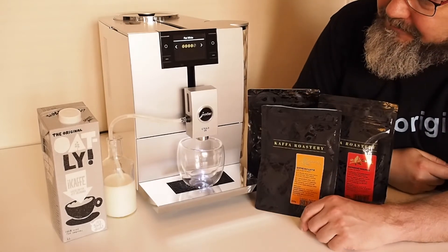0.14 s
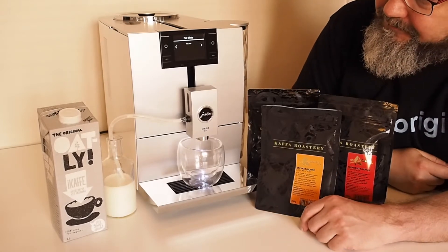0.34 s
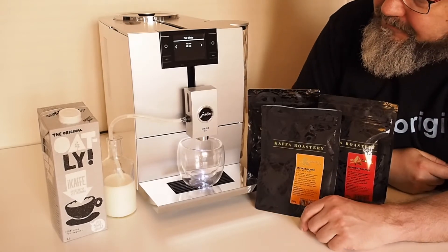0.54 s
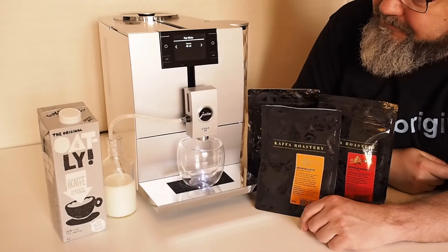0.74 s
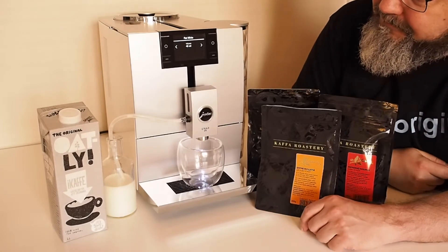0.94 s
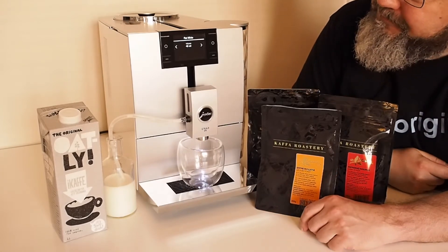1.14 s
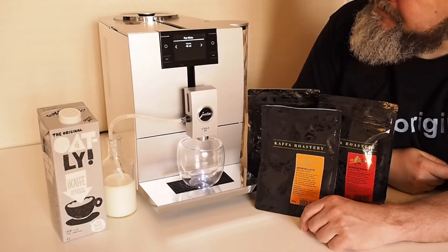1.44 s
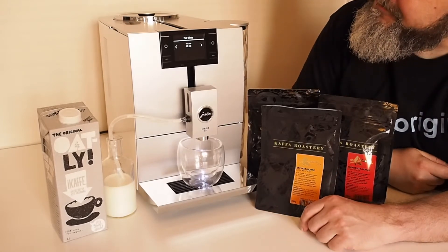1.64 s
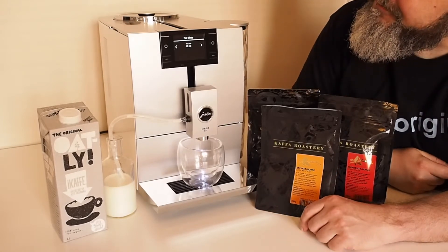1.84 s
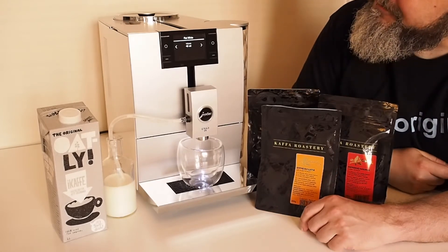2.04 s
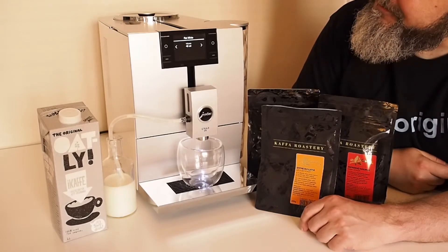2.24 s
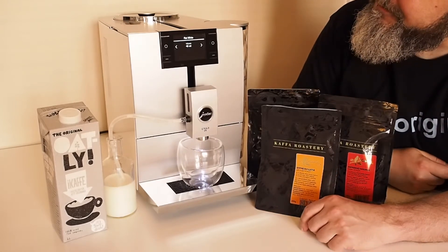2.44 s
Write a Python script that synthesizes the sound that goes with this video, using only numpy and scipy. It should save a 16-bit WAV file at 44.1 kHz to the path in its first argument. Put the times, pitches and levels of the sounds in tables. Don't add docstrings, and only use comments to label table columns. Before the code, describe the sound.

Bean-to-cup coffee machine heard close up in a small kitchen: the tail of coarse grinding, a quiet gap with faint hum, then a rumbling brew motor with plastic knocks, scrapes, a sharp latch snap and falling whine.

```python
import sys
import numpy as np
from scipy import signal
from scipy.fft import rfft, irfft
from scipy.io import wavfile
from scipy.ndimage import uniform_filter1d

SR = 44100
rng = np.random.default_rng(int(sys.argv[2]) if len(sys.argv) > 2 else 0)


def int16_out(signal):
    q = np.round(np.clip(np.atleast_2d(signal).T, -1, 1) * 32767)
    wavfile.write(sys.argv[1], SR, q.astype(np.int16))


def boost_factor(decibels):
    exponent = np.asarray(decibels, float) / 20
    return 10 ** exponent


N = 114660


def level(x, db):
    return x * boost_factor(db) / np.sqrt(np.mean(x ** 2))


def conv(x, h):
    return signal.fftconvolve(x, h)[:N]


def band(x, hz, width_hz):
    return signal.lfilter(*signal.iirpeak(hz, hz / width_hz, SR), x)


def colour(x, points):
    freq_hz = np.arange(2049) * SR / 4096 + 1
    hz, db = np.array(points, float).T
    log_gain = np.interp(np.log(freq_hz), np.log(hz), db) * np.log(10) / 20
    cepstrum = irfft(log_gain)
    cepstrum[1:2048] *= 2
    cepstrum[2049:] = 0
    return conv(x, irfft(np.exp(rfft(cepstrum))))


def grit(per_s, spread_db):
    chance, sign, luck = rng.random((3, N))
    size = np.minimum(-np.log(1 - luck), 3)
    ticks = (chance < per_s / SR) * np.sign(sign - 0.5) * boost_factor(spread_db * size)
    return level(ticks, 0)


def walk(rate):
    hold = int(SR / rate)
    steps = np.repeat(rng.standard_normal(N // hold + 1), hold)
    smooth = uniform_filter1d(uniform_filter1d(steps, hold), hold)[:N]
    return smooth / smooth.std()


def bursts(rows):
    t = np.arange(N) / SR
    total = 0
    for start_s, level_db, length_s, *_ in rows:
        late = np.maximum(t - start_s, 0)
        total = total + boost_factor(level_db) * (t >= start_s) * np.exp(-(late / length_s) ** 2)
    return total


def swell(t, row):
    return boost_factor(row[1]) * np.exp(-((t - row[0]) / row[2]) ** 2)


# pitch_hz, level_db (per Hz)
GRIND_TONE = [(35, -69), (60, -22.5), (254, -4.5), (706, -8), (1000, -7), (1750, -5), (5600, -14),
              (8700, -15.5), (15600, -24.5)]
# time_s, level_db
GRIND_LOAD = [
    (0.0, -14),
    (.025, -17.5),
    (0.06, -19.5),
    (.1, -18.5),
    (0.144, -18),
    (.19, -19),
    (0.23, -19.5),
]
GRIND_STOP_S, COAST_T60_S = 0.24, 0.41


def burrs(t):
    coast_db = -60 * np.maximum(t - GRIND_STOP_S, 0) / COAST_T60_S
    load_db = np.interp(t, *np.array(GRIND_LOAD).T) + coast_db
    cracks = grit(3000, 0.8)
    return level(housing(colour(cracks, GRIND_TONE)), -1.23) * boost_factor(load_db + 1.0 * walk(41.8))


# start_s,
# level_db, length_s, pitch_hz
BEANS = [(0.027, -27.5, 0.079, 9240), (0.069, -29, 0.033, 4280), (0.087, -29.5, 0.013, 9400),
         (0.116, -28.5, 0.065, 4100), (0.12, -26.5, 0.04, 9400), (0.141, -23, 0.033, 712),
         (0.137, -18.5, 0.027, 476.4), (0.198, -30.5, 0.081, 1047), (0.209, -24, 0.025, 3840),
         (.212, -21.5, 0.011, 8850), (0.218, -26, 0.03, 712), (.3935, -50.5, 0.005, 10600),
         (.4575, -70, .004, 9600), (0.58, -53.5, 0.0037, 9400), (.579, -54.5, .004, 4500)]
BEAN_Q_AT_1K, BEAN_Q_SLOPE = 29, -0.75


def cracking_beans():
    chips = grit(6000, 1.7)
    out = 0
    for row in BEANS:
        hz = row[3]
        width_hz = hz / (BEAN_Q_AT_1K * (hz / 1000) ** BEAN_Q_SLOPE)
        out = out + band(chips * bursts([row]), hz, width_hz) * np.sqrt(SR / np.pi / width_hz)
    return out


# time_s, shaft_hz, rumble_db, whine_db
MOTOR = [(1.38, 83.8, -40.5, -57), (1.45, 95.65, -40.5, -46), (1.5, 100.3, -35.5, -49),
         (1.561, 106.1, -36, -42), (1.68, 109, -35, -44), (1.76, 113.3, -36, -53), (1.849, 114.3, -37, -44),
         (1.899, 110.1, -38, -46), (1.948, 106.8, -37, -42), (2.019, 101.1, -36, -50),
         (2.121, 101.5, -35, -42), (2.239, 101.1, -37.5, -41), (2.291, 98.25, -35, -49),
         (2.34, 95.7, -38, -40.5), (2.39, 90.07, -36.5, -45), (2.452, 85.76, -34.5, -40),
         (2.53, 81.4, -38.5, -43), (2.6, 79.3, -37.5, -52)]
MOTOR_ON_S, MOTOR_RISE_S = 1.357, 0.0016


def brew_motor(t):
    when, shaft_hz, rumble_db, whine_db = np.array(MOTOR).T
    shaft_hz, rumble_db, whine_db = (np.interp(t, when, column) for column in (shaft_hz, rumble_db, whine_db))
    turn = 2 * np.pi * np.cumsum(shaft_hz * (1 + 0.0059 * walk(30.07))) / SR
    teeth = grit(4000, 1) * (1 + 0.14 * np.cos(turn))
    noise = gear_rumble(teeth) + brush_hiss(t, turn, teeth, shaft_hz)
    tones = gear_whine(t, turn, whine_db) + shell_booms(t)
    on = np.clip((t - MOTOR_ON_S) / MOTOR_RISE_S, 0, 1)
    return on * noise * boost_factor(rumble_db), on * tones


# pitch_hz, level_db (per Hz)
RUMBLE_TONE = [(29, -70), (50, -21.5), (227, -3.5), (300, -6), (720, -9.5), (880, -13.5), (2500, -23),
               (10300, -35.5), (15600, -69)]
# pitch_hz, width_hz, level_db
TRAY = [(133, 23, -12.5), (183.4, 19, -12), (279, 21, -16)]


def gear_rumble(teeth):
    rumble = level(housing(colour(teeth, RUMBLE_TONE)), 0) * boost_factor(1.0 * walk(24.94))
    for hz, width_hz, db in TRAY:
        ring = band(band(teeth, hz, width_hz), hz, 2 * width_hz)
        rumble = rumble + level(ring, db + 1.7 * walk(6.73))
    return rumble


# pitch_hz, width_hz, level_db
SING = [(10600, 150, -30), (5530, 300, -26.5)]
# pitch_hz, width_hz, level_db
BEARING = (5600, 3000, -31)
# start_s, end_s, pitch_hz, width_hz, level_db
SQUEAL = (1.93, 2.22, 7950, 70, -30)
BRUSH_DB_PER_HZ, FULL_HZ = 0.16, 110


def brush_hiss(t, turn, teeth, shaft_hz):
    rubbing = rng.standard_normal(N) * (1 + 0.1 * np.cos(turn))
    hiss = level(band(rubbing, 10300, 3500), -17.5)
    for hz, width_hz, db in SING:
        hiss = hiss + level(band(rubbing, hz, width_hz), db + 3 * walk(8))
    hz, width_hz, db = BEARING
    hiss = hiss + level(band(teeth, hz, width_hz), db)
    hiss = hiss * boost_factor(BRUSH_DB_PER_HZ * (shaft_hz - FULL_HZ))
    start_s, end_s, hz, width_hz, db = SQUEAL
    return hiss + (t > start_s) * (t < end_s) * level(band(rubbing, hz, width_hz), db)


# multiple of the shaft speed, level_db
ORDERS = [(1, -12), (2, -11), (3, -10), (4, -18), (5, -1.5), (10, -14)]
# centre_s, level_db, half_length_s
WHINE_SWELLS = [(1.545, -40, .015), (1.607, -42.5, .025), (1.8, -35.5, 0.012), (1.864, -42.5, 0.023),
                (1.947, -33, 0.024), (2.242, -48, .025), (2.357, -41.5, 0.032), (2.457, -34, .025),
                (2.52, -44, 0.025)]
PRESS_S, PRESS_RISE_S, FREE_DB, PRESSED_DB = 1.93, 0.21, -49, -35


def gear_whine(t, turn, whine_db):
    press_db = np.interp(t, [PRESS_S, PRESS_S + PRESS_RISE_S], [FREE_DB, PRESSED_DB])
    swells = sum(swell(t, row) for row in WHINE_SWELLS)
    whine = 0
    for order, db in ORDERS:
        if order > 4:
            gain = boost_factor(whine_db - 4 + 3.2 * walk(35.06)) + swells
        else:
            gain = boost_factor(press_db + 3.2 * walk(35.06))
        tone = np.sqrt(2) * boost_factor(db) * gain * np.sin(order * turn + order * order)
        if order == 3:
            tone = band(tone, 276, 20)
        whine = whine + tone
    return whine


# centre_s, level_db, half_length_s, pitch_hz
BOOMS = [(1.383, -43, .03, 132), (1.44, -44, 0.036, 130), (1.455, -40.5, 0.014, 670),
         (1.535, -36.5, 0.024, 695), (1.545, -47, .015, 395), (1.553, -34, 0.015, 272),
         (1.596, -41, 0.022, 133), (1.675, -38.5, 0.012, 665), (1.746, -40.5, 0.033, 130),
         (1.826, -42, 0.032, 185), (1.983, -34.5, 0.02, 280), (2.04, -43, 0.016, 280),
         (2.123, -44, .03, 270), (2.28, -43, .035, 275), (2.375, -42, .035, 132),
         (2.406, -34.5, 0.038, 274), (2.48, -36, 0.023, 258), (2.561, -35.5, 0.032, 264)]


def shell_booms(t):
    shake = 2 * np.pi * np.cumsum(1 + 0.008 * walk(40.2)) / SR
    return sum(np.sqrt(2) * swell(t, row) * np.sin(row[3] * shake) for row in BOOMS)


# start_s, level_db, rattle_length_s
KNOCKS = [(1.3575, -30.5, 0.015), (1.371, -40.5, .012), (1.431, -41, 0.007), (1.45, -31, 0.015),
          (1.472, -35.5, 0.018), (1.517, -34, 0.012), (1.536, -35, 0.029), (1.669, -31.5, 0.013),
          (1.796, -31, 0.0039), (1.823, -37.5, 0.011), (1.893, -39, 0.0055), (1.924, -34.5, 0.026),
          (1.978, -33.5, 0.0093)]
# pitch_hz, width_hz, level_db
KNOCK_MODES = [(135, 25, -9), (275, 40, -4), (320, 40, -4), (372, 40, -3), (700, 60, 2)]


def gear_knocks():
    hits = grit(2500, 2.4) * bursts(KNOCKS)
    for start_s, db, _ in KNOCKS:
        hits[int(start_s * SR)] += boost_factor(db + 20)
    hits = signal.sosfilt(signal.butter(4, 760, fs=SR, output="sos"), hits)
    out = 0
    for hz, width_hz, db in KNOCK_MODES:
        out = out + band(hits, hz, width_hz) * boost_factor(db) * np.sqrt(SR / np.pi / width_hz)
    return out * boost_factor(-5)


# start_s, level_db, pitch_hz, ring_width_hz
BLOWS = [
    (1.359, -25, 620, 180),
    (1.4515, -29, 680, 180),
    (1.5185, -31, 700, 200),
    (1.5365, -27, 560, 200),
    (1.7975, -22, 690, 150),
    (1.8235, -24, 800, 400),
    (1.8935, -24, 560, 300),
    (1.979, -24, 400, 250),
]


def shell_blows(t):
    out = 0
    for start_s, db, hz, width_hz in BLOWS:
        late = np.maximum(t - start_s, 0)
        out = out + boost_factor(db) * np.exp(-np.pi * width_hz * late) * np.sin(2 * np.pi * hz * late)
    return out


# start_s, level_db, fall_s, pitch_hz
SCRAPES = [(1.358, -45, .025, 2500), (1.374, -45, .025, 2700), (1.392, -50, .02, 4300),
           (1.451, -43, .02, 1700), (1.516, -47, .03, 3800), (1.541, -41, .04, 2100),
           (1.597, -46, .04, 2300), (1.667, -47, .025, 1700), (1.781, -48, .02, 3500),
           (1.797, -38, .065, 2200), (1.799, -41, .06, 5200), (1.858, -49, .025, 6000),
           (1.884, -50, .02, 6000), (1.918, -43, .035, 1300), (1.995, -44, .04, 3200),
           (2.03, -45, .04, 2900), (2.1, -46, .04, 3100), (2.17, -45, .04, 2900), (2.195, -46, .04, 3000),
           (2.365, -47, .08, 2000)]


def rail_scrapes(t):
    rub = grit(6000, 1.9)
    out = 0
    for start_s, db, fall_s, hz in SCRAPES:
        late = t - start_s
        shape = np.clip(late / 0.002, 0, 1) * np.exp(-np.maximum(late, 0) / fall_s)
        scrape = level(housing(band(rub, hz, 0.61 * hz)), db)
        out = out + shape * boost_factor(2.1 * walk(60)) * scrape
    return out


# start_s, level_db, length_s, pitch_hz
CLICKS = [(1.3585, -53, .005, 9500), (1.3554, -49, 0.0037, 4500), (1.375, -42.5, .004, 5000),
          (1.3775, -43, 0.0048, 7800), (1.517, -54, .003, 7300), (1.781, -35, 0.005, 9000),
          (1.7806, -41, 0.0044, 5500), (1.7964, -34.5, .013, 11000), (1.798, -32.5, 0.0072, 6400),
          (1.801, -30, 0.01, 4730), (1.802, -34, .005, 9500), (1.811, -49, .012, 7500),
          (1.792, -34, 0.023, 1840)]
# start_s, level_db, length_s, pitch_hz
CHUTE = (0.252, -35, .035, 2800)


def latch_and_chute():
    snap = grit(14000, 1.1)
    out = 0
    for row in CLICKS + [CHUTE]:
        hz = row[3]
        click = band(band(snap, hz, 0.61 * hz), hz, 1.2 * hz)
        out = out + level(click, 0) * bursts([row])
    return out


# pitch_hz, width_hz, level_db
HOUSING = [(129, 8.4, -6), (283, 50, -1), (407, 32, 0), (497, 132, 2), (645, 100, 0.5), (712, 26, -1.5),
           (1043, 47, -5), (1420, 20, -32), (1784, 170, -6.5), (2020, 96, -10.5), (3220, 380, -8.5),
           (4100, 330, -12), (8700, 340, -17), (10100, 740, -14)]


def housing(x):
    return boost_factor(-1.5) * x + sum(band(x, hz, width_hz) * boost_factor(db) for hz, width_hz, db in HOUSING)


ROOM_T60_S, ROOM_TOP_T60_S, ROOM_DB, ROOM_DELAY_S = 0.36, 0.24, -8, 0.00414


def room(x):
    t = np.arange(int(SR * 0.8)) / SR
    echoes = rng.standard_normal(len(t)) * (t > ROOM_DELAY_S)
    low = signal.lfilter(*signal.butter(1, 5000, fs=SR), echoes)
    tail = low * boost_factor(-60 * t / ROOM_T60_S) + (echoes - low) * boost_factor(-60 * t / ROOM_TOP_T60_S)
    return conv(x, tail / np.sqrt(np.sum(tail ** 2)))


# pitch_hz, level_db (per Hz)
KITCHEN_TONE = [(18, -17), (30, -8.5), (75, -4.5), (203, -7), (342, -12.5), (444, -10), (1200, -22),
                (2020, -22.5), (15600, -36)]
# pitch_hz, level_db
HUM = [(48.4, -63), (199.2, -66.5), (441.4, -72), (882.9, -72.5)]


def kitchen(t):
    mid, side = (level(colour(rng.standard_normal(N), KITCHEN_TONE), -53.8) for _ in range(2))
    hum = 0
    for hz, db in HUM:
        hum = hum + np.sqrt(2) * boost_factor(db + 2.0 * walk(5.1)) * np.sin(2 * np.pi * hz * t)
    return mid * boost_factor(1.0 + 0.5 * walk(2.73)) + hum, side * boost_factor(-3.5)


WHINE_ROOM = 0.25
SIDE_HZ, SIDE_DB, SIDE_BASS_DB, LEFT_DB = 4700, -4, -27, 1


def scene():
    t = np.arange(N) / SR
    gears, whine = brew_motor(t)
    brew_unit = gear_knocks() + shell_blows(t) + rail_scrapes(t) + latch_and_chute()
    machine = burrs(t) + cracking_beans() + gears + brew_unit + WHINE_ROOM * whine
    mid = machine + boost_factor(ROOM_DB) * room(machine) + (1 - WHINE_ROOM) * whine

    scatter = rng.standard_normal(5000) * np.exp(-np.arange(5000) / 1300.0)
    scattered = conv(machine, scatter / np.sqrt(np.sum(scatter ** 2)))
    other = scattered + boost_factor(ROOM_DB) * room(machine)
    steep = signal.butter(3, SIDE_HZ, "high", fs=SR, output="sos")
    side = boost_factor(SIDE_DB) * signal.sosfilt(steep, other)
    side = side + boost_factor(SIDE_BASS_DB) * band(other, 800, 1200)
    side = side + (boost_factor(LEFT_DB) - 1) / 2 * signal.sosfilt(steep, mid)

    tone_mid, tone_side = kitchen(t)
    mid, side = mid + tone_mid, side + tone_side
    return np.array([mid + side, mid - side])


def band_limit(x):
    return signal.sosfilt(signal.butter(12, 15760, fs=SR, output="sos"), x)


# pitch_hz, level_db
MIC = [(25, -12), (50, -1.5), (4400, -0.5), (4900, -5), (8000, -2), (11500, -2), (13400, -9.5), (15500, -7)]
# pitch_hz, width_hz, depth (0-1)
TREBLE_NOTCH = (13450, 250, .6)


def record(dry):
    notch_hz, width_hz, depth = TREBLE_NOTCH
    heard = np.array([colour(ch - depth * band(ch, notch_hz, width_hz), MIC) for ch in dry])
    top_cut = signal.ellip(8, 0.2, 70, 15760, fs=SR, output="sos")
    mix = signal.sosfilt(top_cut, heard)
    return band_limit(mix)


dry = scene()
out = record(dry)
int16_out(out)
```